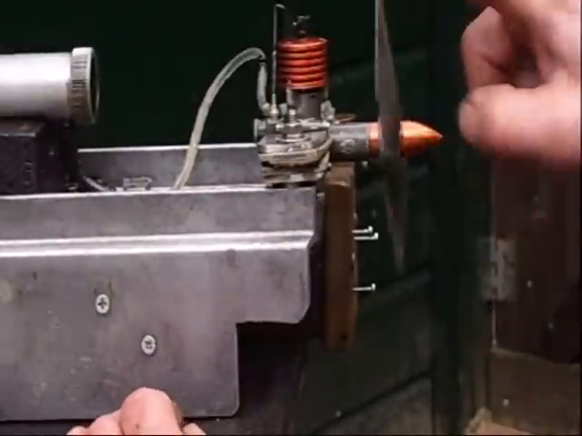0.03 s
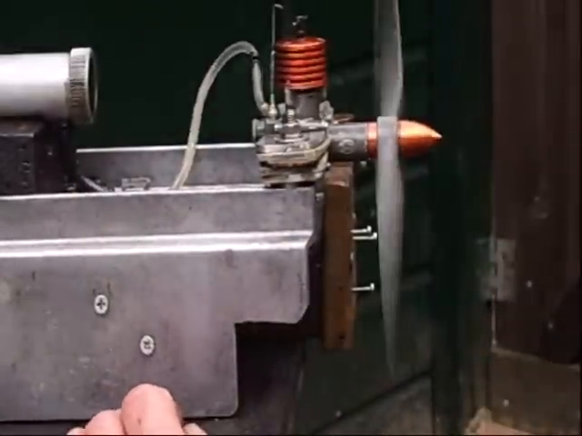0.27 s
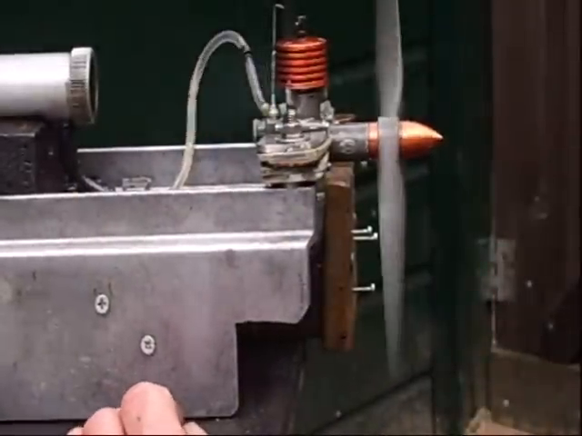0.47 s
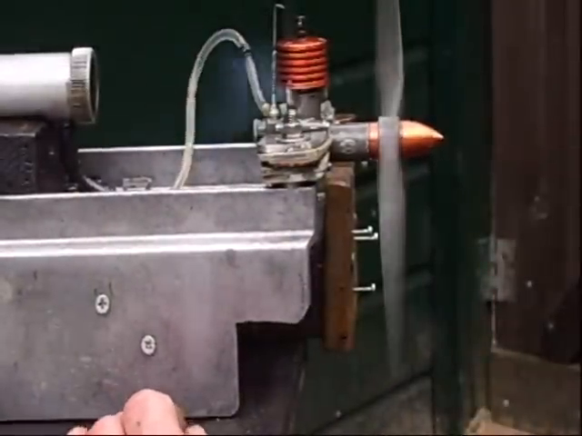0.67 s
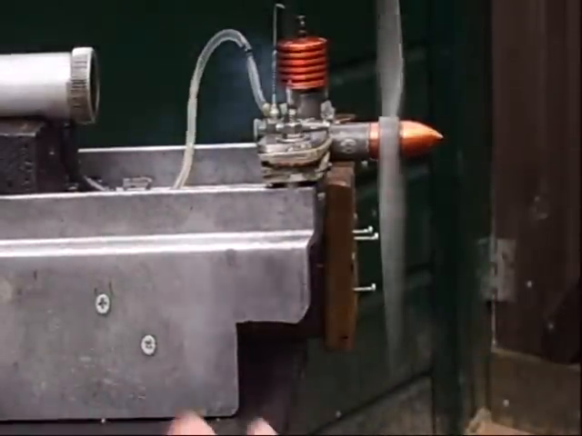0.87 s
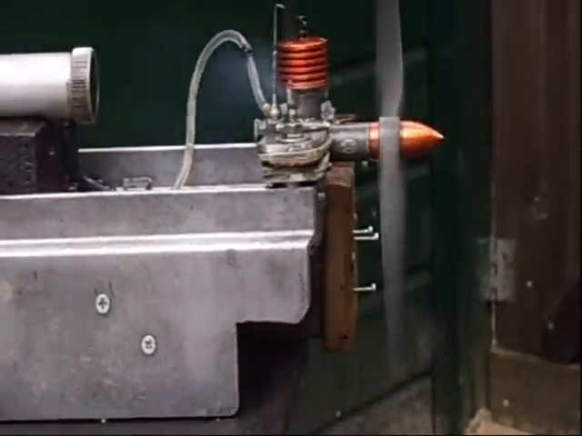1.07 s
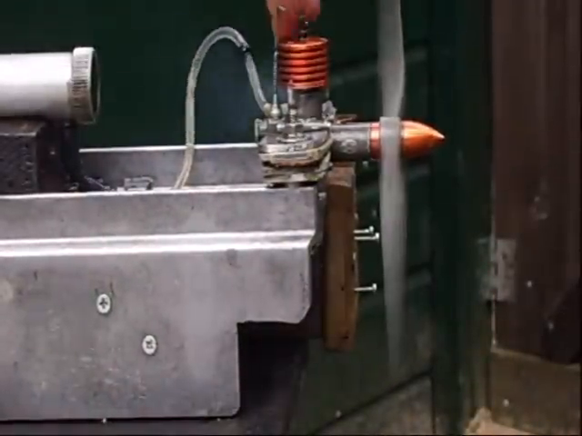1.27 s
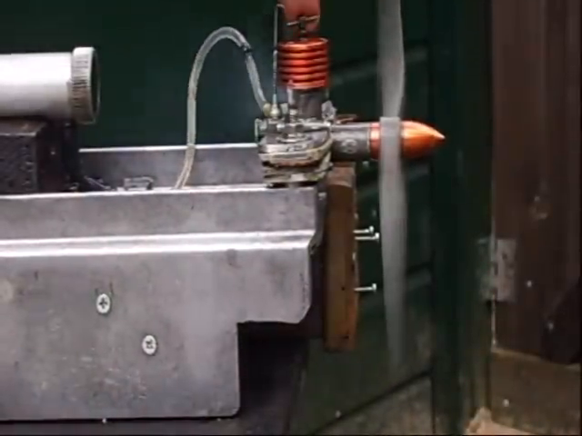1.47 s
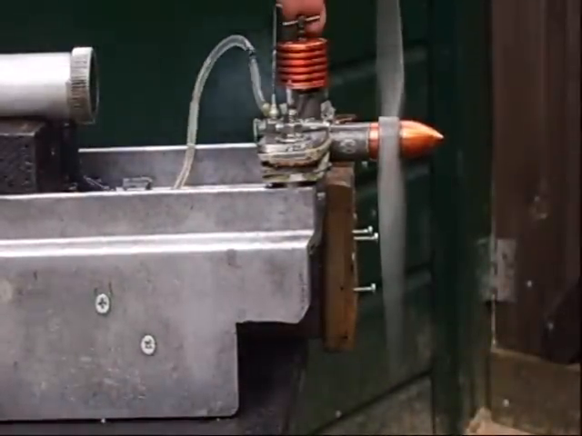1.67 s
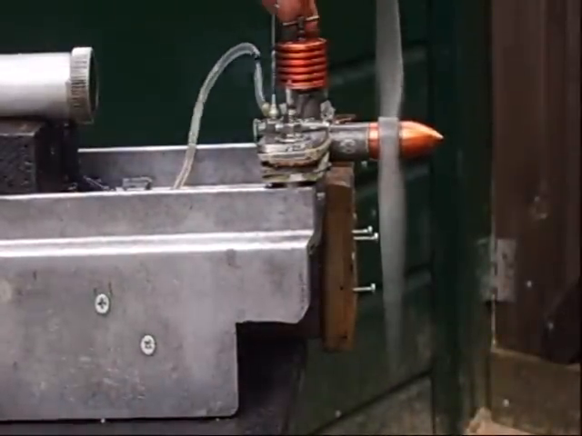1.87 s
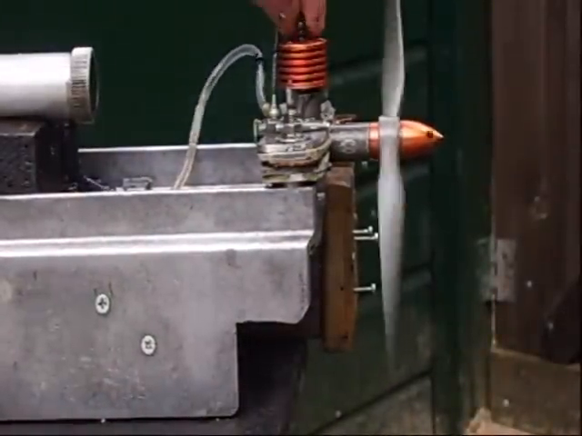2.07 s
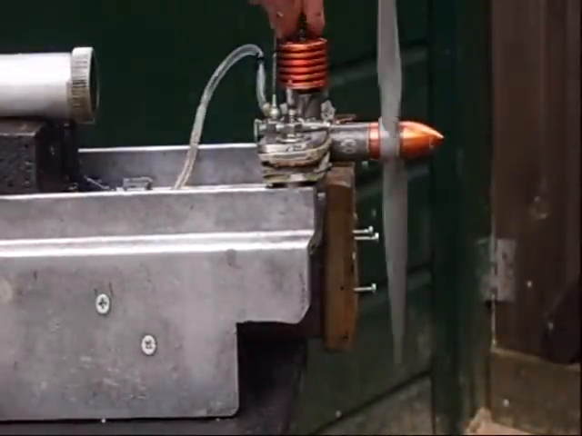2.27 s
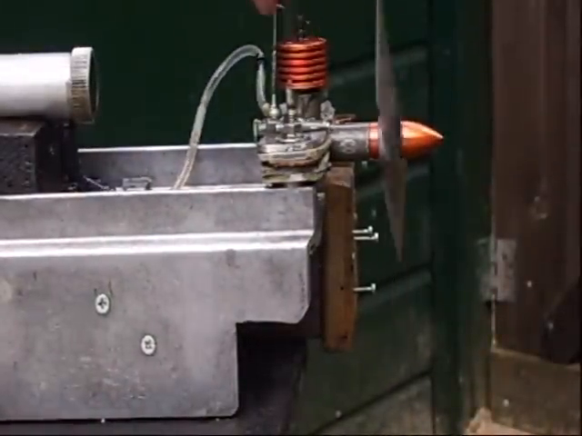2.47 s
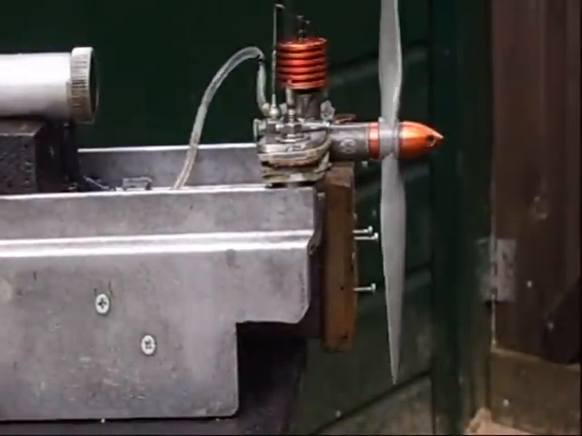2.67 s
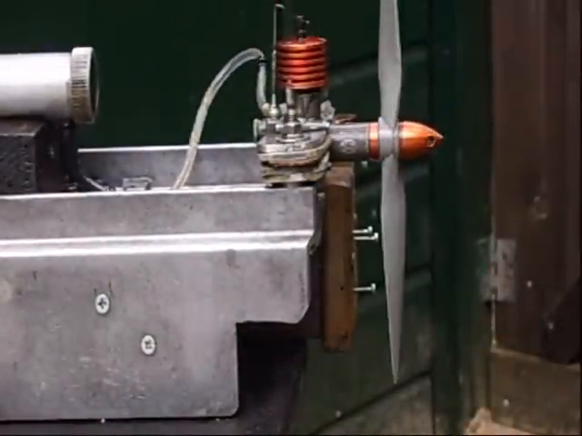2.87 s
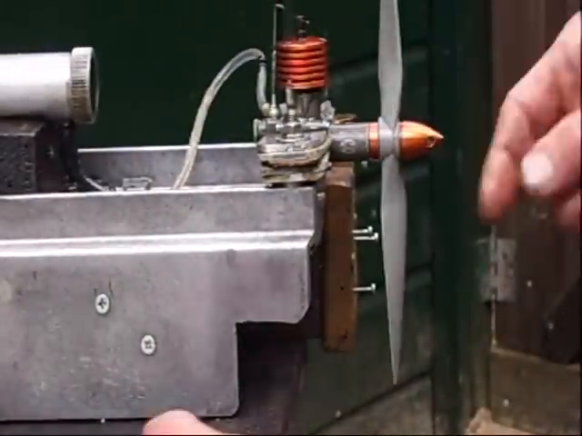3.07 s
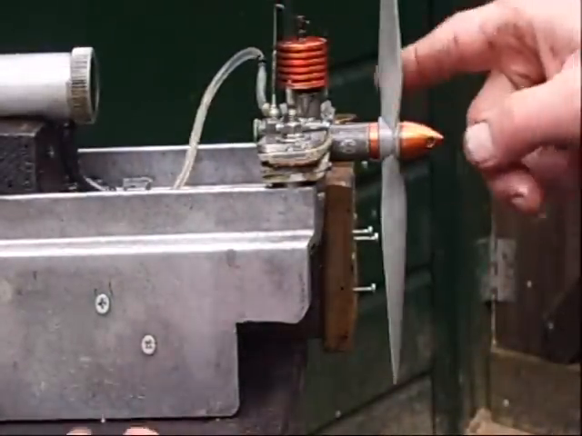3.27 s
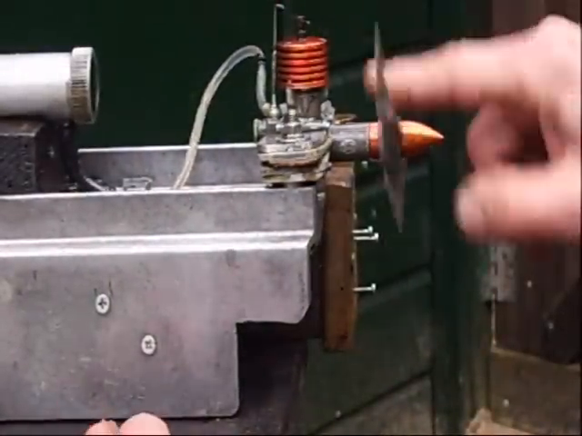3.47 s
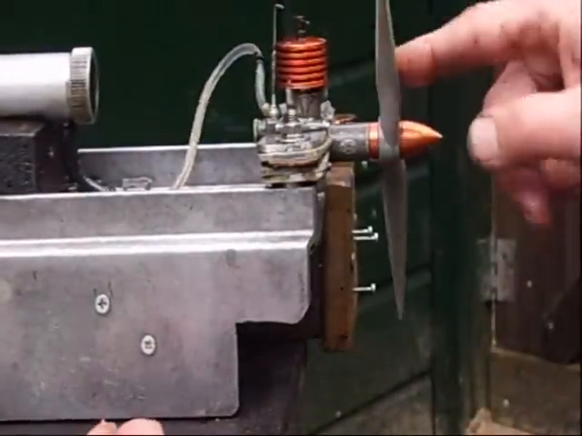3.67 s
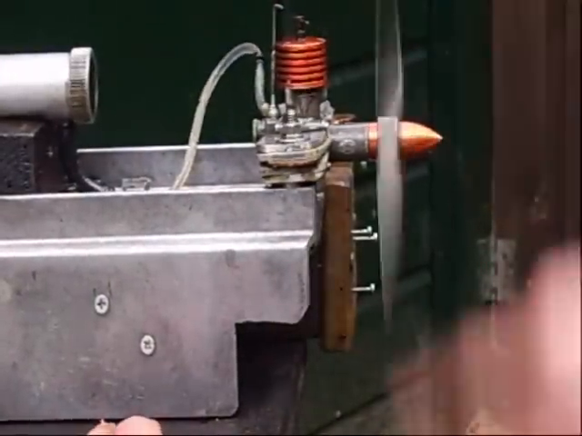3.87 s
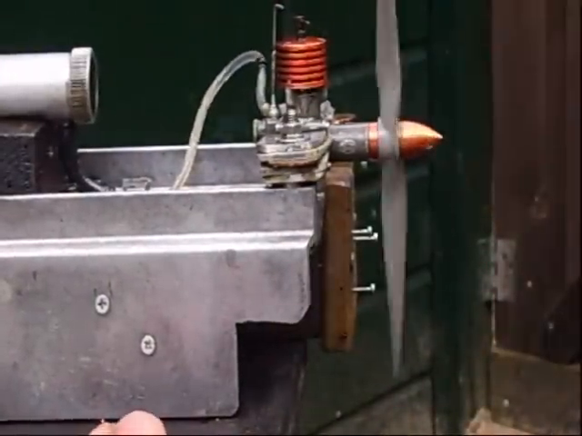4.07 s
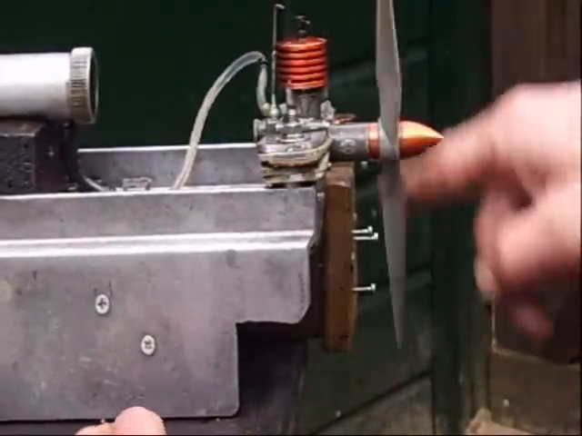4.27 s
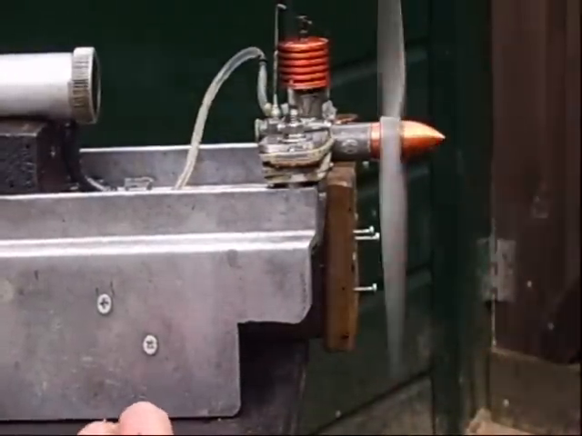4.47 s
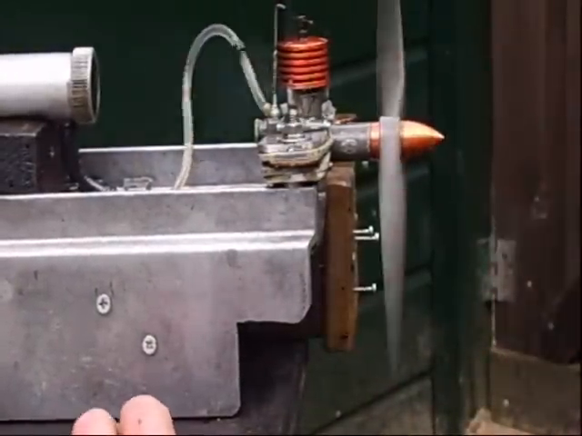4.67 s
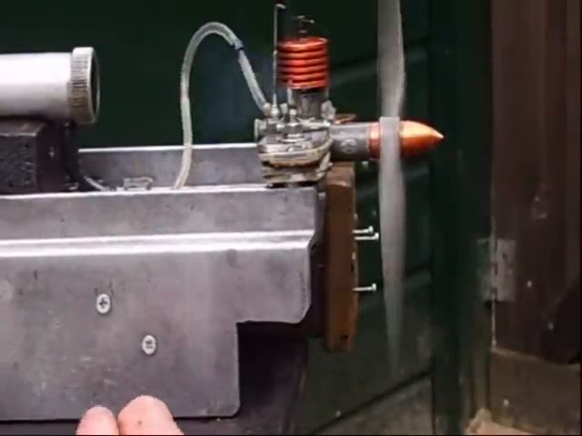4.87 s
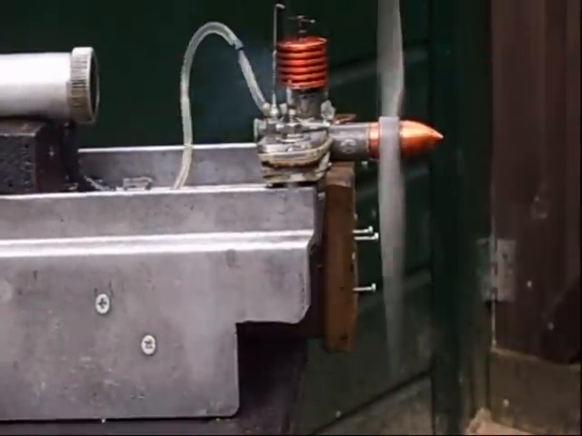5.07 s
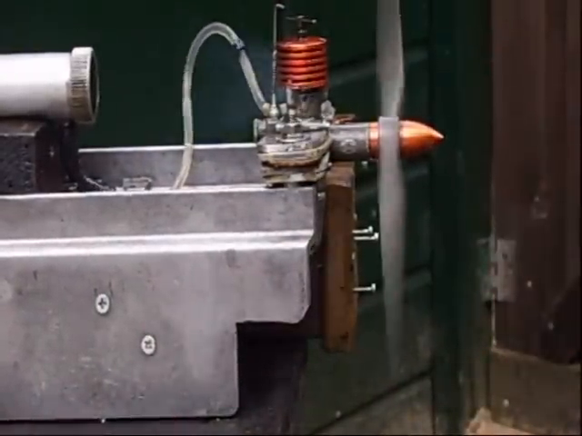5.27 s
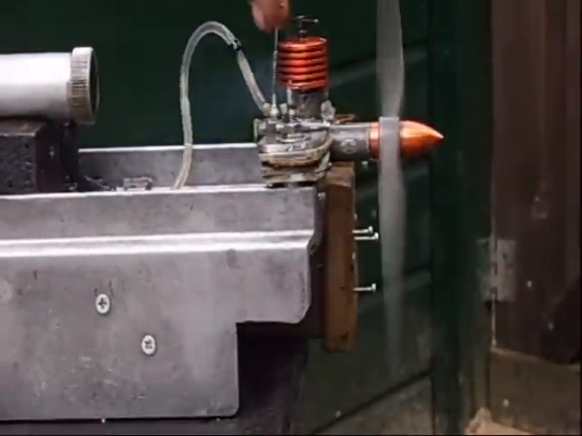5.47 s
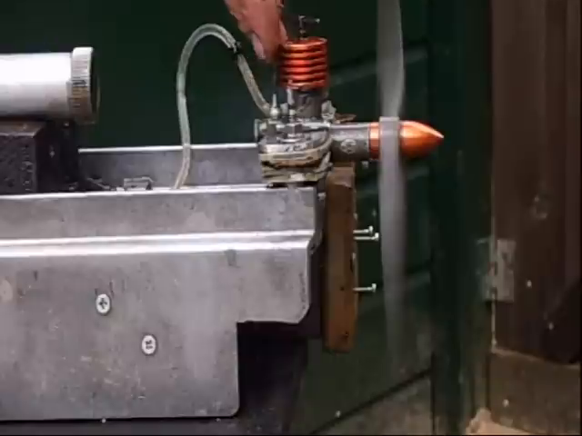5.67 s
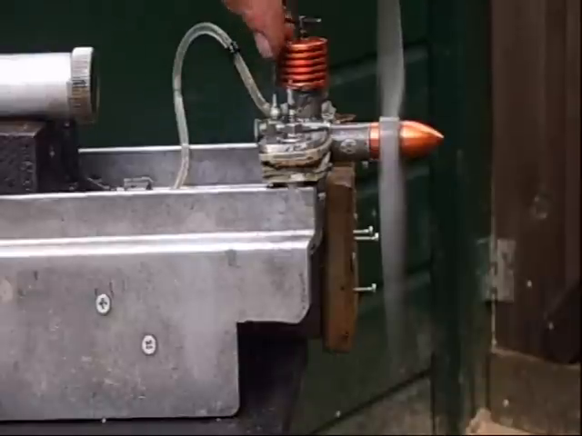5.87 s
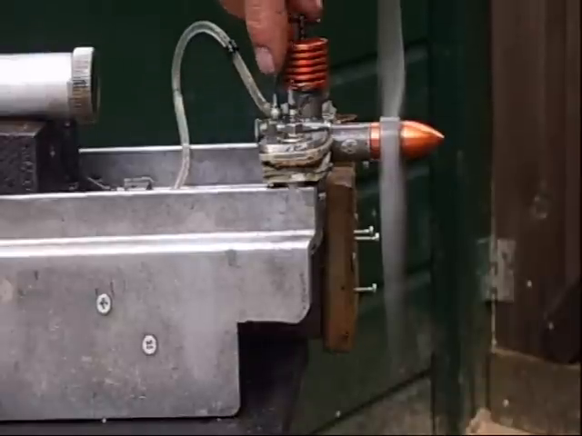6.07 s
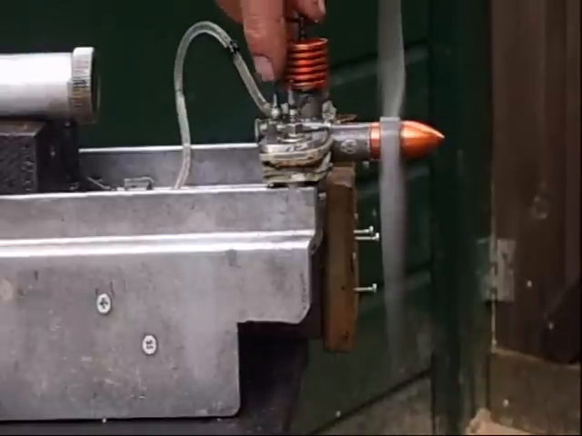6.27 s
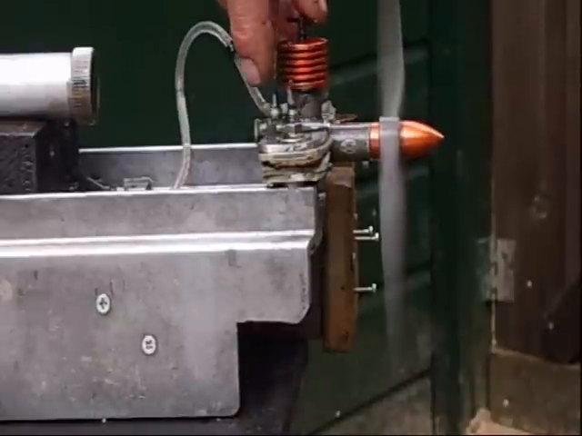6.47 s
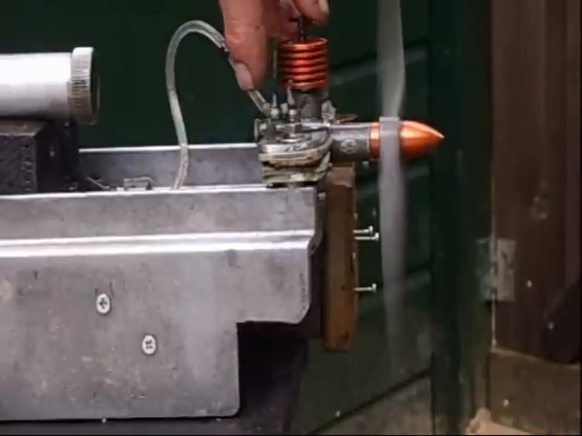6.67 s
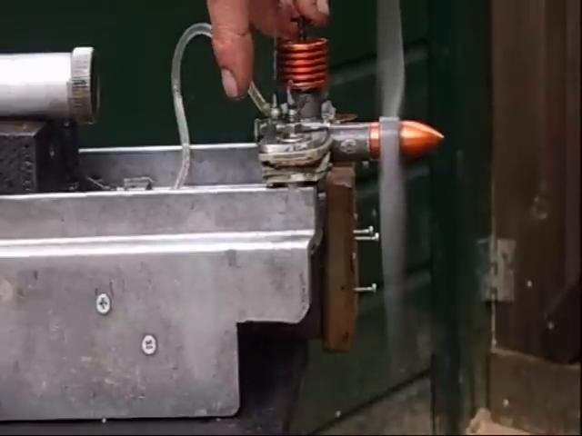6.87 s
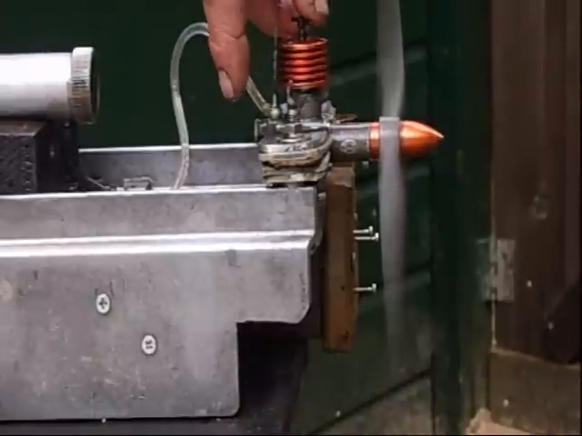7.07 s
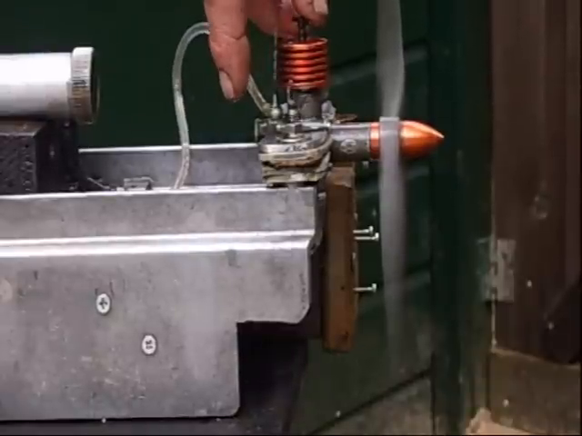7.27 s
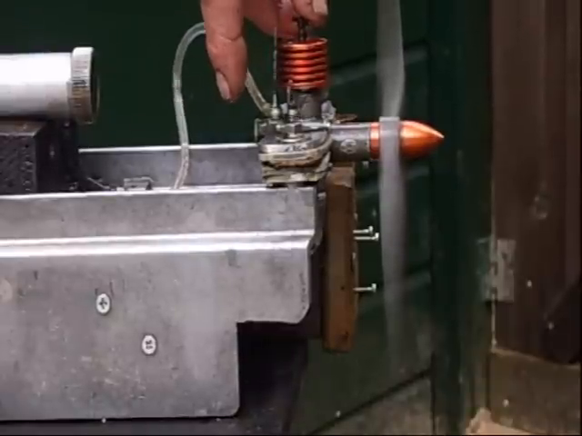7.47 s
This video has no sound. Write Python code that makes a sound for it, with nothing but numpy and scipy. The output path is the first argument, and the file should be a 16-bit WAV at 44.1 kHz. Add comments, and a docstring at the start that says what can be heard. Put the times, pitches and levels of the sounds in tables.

```python
"""In a wooden shed, a tiny two-stroke diesel with a propeller is flicked, runs, dies, sputters once and revs up.
Clicks timed by the turning shaft drive every blast: ignition knocks in the head, the exhaust port cracks open
through ringing resonances and hissing noise, the transfer thumps soon after and the gas surges on.
A wall throws the blast back, with weaker echoes and a short diffuse tail; propeller tones and wash lie beneath.
Between the runs a hand rustles as grainy band noise; shaped noise and two sines make the shed's hush and whine."""
import sys
import numpy as np
from scipy import signal
from scipy.fft import rfft, irfft, next_fast_len
from scipy.io import wavfile

SR = 44100
rng = np.random.default_rng(int(sys.argv[2]) if len(sys.argv) > 2 else 0)


def attenuation_scalar(level_db):
    """Turn a level in dB into a linear amplitude multiplier (20 dB per decade)."""
    decades = np.asarray(level_db, float) / 20
    return 10 ** decades


def digitize_waveform(pressure):
    """Quantize a signal to 16-bit integers and store it at the path in sys.argv[1].

    Rows of a 2-D input are taken as channels; values are limited to [-1, 1].
    """
    field = np.atleast_2d(pressure).T
    bounded = np.clip(field, -1, 1)
    quanta = np.round(bounded * 32767).astype(np.int16)
    wavfile.write(sys.argv[1], SR, quanta)


N = 332073


def band(x, low_hz, high_hz):
    """Butterworth band-pass."""
    return signal.sosfilt(signal.butter(2, [low_hz, high_hz], "band", fs=SR, output="sos"), x)


def noise(low_hz, high_hz):
    """Band noise of rms 1."""
    x = band(rng.standard_normal(N), low_hz, high_hz)
    return x / x.std()


def clicks(s, db):
    """Impulses, each shared between its two nearest samples."""
    at = np.clip(np.asarray(s) * SR, 0, N)
    first, late = at.astype(int), at % 1
    out = np.zeros(N + 2)
    np.add.at(out, first, attenuation_scalar(db) * (1 - late))
    np.add.at(out, first + 1, attenuation_scalar(db) * late)
    return out[:N] + 1e-18      # the offset keeps the filters out of denormal numbers


def resonate(x, modes):
    """Parallel decaying resonances of alternating sign; a wider mode dies away faster."""
    out = np.zeros(N)
    for k, (hz, width_hz, db) in enumerate(modes):
        r = np.exp(-np.pi * width_hz / SR)
        w = 2 * np.pi * hz / SR
        ring = signal.lfilter([0, np.sin(w)], [1, -2 * r * np.cos(w), r * r], x)
        out += (-1) ** k * attenuation_scalar(db) * ring
    return out


def puff(x, decay_s):
    """Envelope that jumps at each click and dies away exponentially."""
    return signal.lfilter([1], [1, -np.exp(-1 / (decay_s * SR))], x)


def hush():
    """Steady air noise of a fixed spectral shape and a thin whine of sines."""
    # relative spectrum of the shed's air: (frequency [Hz], density [dB per Hz])
    air_shape = [(12, -61), (20, -18), (47, 1.5), (83, -6), (394, -6.5), (478, -4), (1070, -10),
                 (1270, -16.5), (3970, -29), (4830, -32), (5250, -32), (9160, -37.5), (15600, -30)]
    # whine: (frequency [Hz], rms level [dB])
    whine_tones = [(4683, -72), (9324, -77.5)]
    air_db = -51    # rms
    shape_hz, shape_db = np.transpose(air_shape)
    hz = np.maximum(np.fft.rfftfreq(N, 1 / SR), 1)
    gain = attenuation_scalar(np.interp(np.log(hz), np.log(shape_hz), shape_db))
    air = irfft(rfft(rng.standard_normal(N)) * gain, N)
    t = np.arange(N) / SR
    whine = sum(np.sqrt(2) * attenuation_scalar(db) * np.sin(2 * np.pi * f_hz * t) for f_hz, db in whine_tones)
    return attenuation_scalar(air_db) * air / air.std() + whine


def rustle():
    """Grainy cloth noise: dull, scraping and bright, over a handling rumble."""
    # brushes of hand and sleeve, drive levels: (peak time [s], fade either side [dB per s],
    # dull [dB], scrape [dB], bright [dB], rumble [dB])
    brushes = [(2.93, 450, -41.5, -61, -68, -66), (2.985, 160, -57, -56, -70, -72),
               (3.05, 203, -52, -61, -59, -68), (3.11, 222, -41, -50, -55, -43),
               (3.18, 250, -63, -64, -60, -67)]
    t = np.arange(N) / SR
    dull, scrape, bright, rumble = sum(attenuation_scalar(np.array(db)[:, None] - fade * np.abs(t - s))
                                       for s, fade, *db in brushes)
    grain = attenuation_scalar(1.8 * noise(14, 270))   # random level flutter, 1.8 dB rms
    treble = scrape * band(noise(2100, 4000), 2200, 3700) + bright * noise(3500, 13000)
    return dull * noise(320, 930) + rumble * noise(30, 240) + grain * treble


def running():
    """Shaft phase sets the blasts of both runs, as rows (s, turns per s, burn dB), and the propeller tones."""
    # the two runs, each from its first blast: (time [s], speed [turns per s], strength of the burn [dB])
    runs = [
        [(.3613, 43, -1), (.42, 52.4, -0.5), (.48, 53, 0.5), (.55, 69, 0.5), (.62, 77, -0.5), (.7, 73.3, -2.5),
         (.8, 71, -0.5), (1.02, 68, -0.5), (1.2, 74, -0.5), (1.4, 77.8, 0), (1.5, 75.6, -1), (1.6, 71, -0.5),
         (1.8, 61.8, -1.5), (1.9, 55, -2), (2.0, 44.3, -2)],
        [(4.5, 37.2, -1), (4.56, 55, -0.5), (4.74, 84.5, 2), (4.8, 92.7, -0.5), (4.86, 89, 0), (4.92, 86, -1.5),
         (5.0, 79.3, 0.5), (5.36, 84.3, 0), (5.48, 89.4, 1.5), (5.6, 95.5, 0.5), (5.84, 99.4, -0.5),
         (5.96, 102.3, -0.5), (6.32, 104.6, -1), (6.44, 106.8, 0), (6.56, 107.5, 0), (6.68, 109.7, -1.5),
         (6.8, 110.75, 0.5), (6.92, 111.3, 0), (7.1, 111, -0.5), (7.28, 111.4, -0.5), (7.52, 113.1, -1)],
    ]
    # blade and shaft tones at 110 turns per s: (multiple of the speed, peak level [dB])
    prop_tones = [(2, -41.5), (3, -42.5)]
    rows, prop = [], np.zeros(N)
    for run in runs:
        at_s, speed, burn_db = np.transpose(run)
        tail = 441      # the last turns run on for 10 ms
        n = np.arange(round(at_s[0] * SR), min(round(at_s[-1] * SR) + tail, N))
        rate = np.interp(n / SR, at_s, speed)
        turns = np.cumsum(rate) / SR
        blast_s = np.interp(np.arange(int(turns[-1]) + 1), turns, n / SR)    # one blast a turn
        blast_speed = np.interp(blast_s, at_s, speed)
        rows.append(np.column_stack([blast_s, blast_speed, np.interp(blast_s, at_s, burn_db)]))
        thrust = (rate / 110) ** 14     # blade thrust grows steeply with speed
        for multiple, db in prop_tones:
            prop[n] += attenuation_scalar(db) * thrust * np.sin(2 * np.pi * multiple * turns)
    return np.vstack(rows), prop


def slipstream(prop):
    """Low noise that follows the propeller tones: its slipstream buffets the microphone."""
    return attenuation_scalar(-25) * np.abs(signal.hilbert(prop)) ** 0.42 * noise(48, 175)


def knocking(s, db, dull_db):
    """Ignition and small contacts: a bright tick, a ring of the head and a dull shake of the bench."""
    # cylinder head and mount, relative: (frequency [Hz], width [Hz], level [dB])
    head = [(2830, 83, 9), (3686, 140, 5.5), (4730, 420, 16), (9320, 107, 2.5), (10600, 430, 8),
            (12300, 100, 2)]
    hit = clicks(s, db)
    burst = attenuation_scalar(8) * hit + puff(hit, 0.0005) * rng.standard_normal(N)
    tick = band(burst, 4000, 9000)
    bench = puff(clicks(s, db + dull_db), 0.0037) * noise(300, 1140)
    return tick + attenuation_scalar(-28.5) * resonate(burst, head) + attenuation_scalar(-0.5) * bench


def exhaust(s, lag_s, thump_db, push_db, crack_db, treble_db, surge_db):
    """The port opens with a push and a ringing crack, gas hisses out, and the transfer thumps just after."""
    # resonances, each table (frequency [Hz], width [Hz], level over its drive [dB]):
    # ring of the crack
    port = [(1423, 146, -3), (2040, 340, -4.5), (2592, 308, 2), (2793, 328, 2.5), (3010, 124, -0.5),
            (3114, 216, -1.5), (3753, 180, -2.5), (4184, 470, -3.5)]
    # treble ring of the crack
    fins = [(5682, 524, 2.5), (8340, 410, -3), (10220, 480, -2), (11100, 42, -16), (12300, 42, -19),
            (16130, 74, 5)]
    # first rush of gas
    gas_push = [(1177, 1910, 7.5), (343, 600, -12.5), (961, 92, -11.5)]
    # crankcase thump
    case = [(725, 329, 1), (327, 990, -4), (940, 37, -17)]
    # soft colour of the surges
    passage = [(962, 570, -2.5)]
    spread_db, colour_db, jitter_s = 0.5, 0.82, 0.000015    # random spreads, standard deviations
    rasp_db, snap_db = -23, -8.5    # rasp drive over the crack's; treble of the transfer over the crack's
    surge_loss_db = 2.5     # each surge is weaker than the one before
    chance = rng.standard_normal((len(s), 4 + len(port)))
    opens = s + jitter_s * chance[:, 0]
    uneven_db = spread_db * chance[:, 1]
    transfer = s + lag_s + jitter_s * chance[:, 2]

    push = clicks(opens, push_db + uneven_db)
    thump = clicks(transfer, thump_db + spread_db * chance[:, 3])
    # the gas surges on at the spacing of the thump
    surges = sum(clicks(opens + k * lag_s, surge_db + uneven_db - surge_loss_db * (k - 1))
                 for k in range(1, 6))
    treble = clicks(opens, treble_db + uneven_db)
    treble = treble + clicks(transfer, treble_db + snap_db + uneven_db)

    crack = np.zeros(N)
    for k, mode in enumerate(port):     # no two cracks have the same colour
        strike = clicks(opens, crack_db + uneven_db + colour_db * chance[:, 4 + k])
        crack += (-1) ** k * resonate(strike, [mode])
    rasp = puff(clicks(opens, crack_db + rasp_db), 0.0046) * noise(1350, 4050)     # turbulence
    hiss = attenuation_scalar(-11) * puff(treble, 0.0028) * noise(7500, 15100)
    gurgle = attenuation_scalar(-29) * puff(thump, 0.0036) * noise(216, 2100)
    rush = resonate(push, gas_push) + resonate(thump, case) + resonate(surges, passage)
    return hiss + gurgle + rasp + crack + resonate(treble, fins) - rush     # the pressure dips first


def engine():
    """Runs and single slow turns drive the same exhaust and head; the propeller is returned apart."""
    # single slow turns, drive levels: (time [s], thump [dB], crack [dB])
    strokes = [(0.183, -7.5, -22.5), (0.2119, -7.5, -18.5), (0.2388, -4.5, -17.5), (0.2606, -6, -16.5),
               (.2839, -7, -22), (0.3067, -7.5, -29), (0.3343, -8, -22), (2.0183, -9, -20.5),
               (2.0434, -9, -19.5), (2.0721, -7.5, -22.5), (2.1027, -7.5, -21.5), (2.1355, -8.5, -22.5),
               (2.1634, -18, -39), (2.1942, -14.5, -32), (2.2483, -27, -43), (2.3325, -24, -44),
               (3.973, -9, -29), (4.0114, -11.5, -21.5), (4.05, -17.5, -35.5), (4.1047, -18.5, -47),
               (4.111, -26, -36), (4.175, -32.5, -48), (4.2647, -36, -53), (4.2812, -29, -49),
               (4.346, -30, -51), (4.4741, -7.5, -20)]
    # knocks and ticks in the metal: (time [s], drive level [dB])
    knocks = [(0.0876, -46), (.1576, -36.5), (.1714, -21.5), (2.0094, -18), (2.0345, -18), (2.0624, -20),
              (2.092, -20), (2.123, -20.5), (2.1602, -25), (2.2295, -37), (3.083, -26.5), (3.107, -44),
              (3.131, -30.5), (3.157, -37.5), (3.3275, -39.5), (3.9993, -22), (4.2494, -48), (4.4439, -45),
              (4.4646, -19)]
    # drive of the after-surges: (level at 80 turns per s [dB], slope [dB per turn per s], share of the burn's dB)
    surge_law = (-12.5, 0.33, 1)
    # the same law for the other parts of a blast
    thump_law, rush_law, crack_law = (-5, -0.0076, 0.9), (-5.5, 0.13, 0.9), (-12, 0.24, 0.9)
    treble_law, ignition_law = (-15.5, 0.24, 0.9), (-16.5, 0.01, 0.9)
    slow_lag_s = 0.002853   # thump after the crack
    slow_rush_db, slow_treble_db, slow_surge_db = 5.5, -2.5, -12    # drives over the crack's
    thump_lag_turns, knock_lead_turns, kick_per_s = 0.10936, 0.34, 36.8
    tick_dull_db, ignition_dull_db = -3.5, -11.5    # dull drive over the tick's
    bass_cut_hz = 215

    rows, prop = running()
    s, per_s, burn_db = rows.T

    def drive(law):
        """Level of one part of each blast, from speed and burn."""
        db, slope, share = law
        return db + slope * (per_s - 80) + share * burn_db

    slow_s, slow_thump_db, slow_db = np.transpose(strokes)
    tick_s, tick_db = np.transpose(knocks)
    # the firing kick speeds a slow crank up
    lag_s = thump_lag_turns / (per_s ** 4 + kick_per_s ** 4) ** 0.25
    gas = exhaust(np.r_[s, slow_s],
                  np.r_[lag_s, np.full(len(slow_s), slow_lag_s)],
                  np.r_[drive(thump_law), slow_thump_db],
                  np.r_[drive(rush_law), slow_db + slow_rush_db],
                  np.r_[drive(crack_law), slow_db],
                  np.r_[drive(treble_law), slow_db + slow_treble_db],
                  np.r_[drive(surge_law), slow_db + slow_surge_db])
    knock_db = drive(ignition_law) + 1.06 * rng.standard_normal(len(s))     # ignition is uneven
    metal = knocking(np.r_[s - knock_lead_turns / per_s, tick_s],
                     np.r_[knock_db, tick_db],
                     np.r_[np.full(len(s), ignition_dull_db), np.full(len(tick_s), tick_dull_db)])
    blasts = gas + metal
    for _ in range(2):      # so small an engine radiates no bass
        blasts = band(blasts, bass_cut_hz, 0.45 * SR)
    return blasts, prop + slipstream(prop)


def shed(x):
    """A strong echo off the nearest wall, two weaker ones, then a dull diffuse tail."""
    # farther walls: (delay [s], level [dB])
    echoes = [(.0079, -18), (.0121, -18)]
    wall_s, wall_db, wall_dull_hz, thin_hz = 0.00462, -2.5, 5330, 1650     # nearest wall, level before its filters
    t60_s, tail_db, tail_cut_hz = 0.24, -6.5, 4500     # diffuse tail, level before its low-pass
    size = next_fast_len(N + SR)
    w = 2 * np.pi * np.fft.rfftfreq(size, 1 / SR)
    thin = 1j * w / (2 * np.pi * thin_hz)      # thin boards let the bass through
    wall = attenuation_scalar(wall_db) * np.exp(-1j * w * wall_s) * thin / (1 + thin)
    response = 1 + wall / (1 + 1j * w / (2 * np.pi * wall_dull_hz)) ** 2
    response += sum(attenuation_scalar(db) * np.exp(-1j * w * delay_s) for delay_s, db in echoes)
    t = np.arange(SR // 2) / SR
    tail = rng.standard_normal(len(t)) * attenuation_scalar(-60 * t / t60_s) * (t > wall_s)
    tail *= attenuation_scalar(tail_db) / np.sqrt(np.sum(tail ** 2))
    response += rfft(tail, size) / (1 + 1j * w / (2 * np.pi * tail_cut_hz))
    return irfft(rfft(x, size) * response, size)[:N]


def scene():
    """Engine and hand echo in the shed; the propeller's air and the hush are added without echo."""
    blasts, prop_air = engine()
    return (shed(blasts + rustle()) + prop_air + hush())[None]


def band_limit(x):
    """A steep low-pass at the top of the band."""
    return signal.sosfilt(signal.butter(12, 15700, fs=SR, output="sos"), x)


def record(dry):
    """The small microphone overloads on the loudest blasts: it clips hard at full scale."""
    return band_limit(np.clip(dry, -1, 1))


dry = scene()
out = record(dry)
digitize_waveform(out)
```